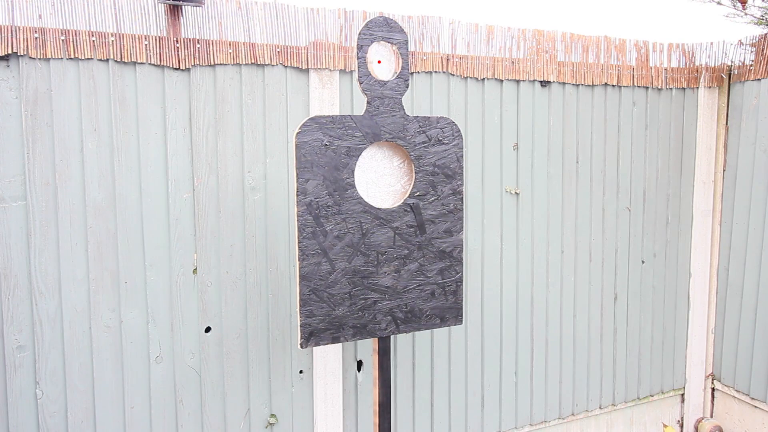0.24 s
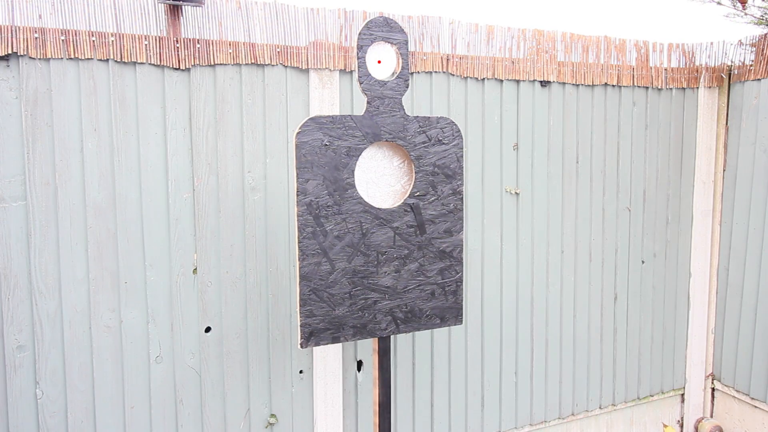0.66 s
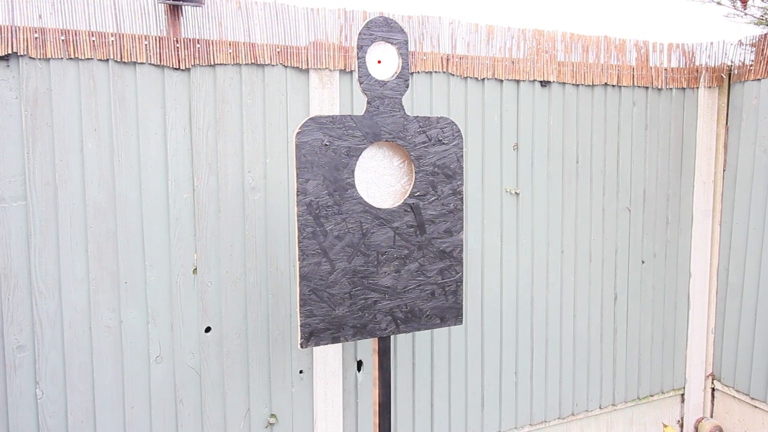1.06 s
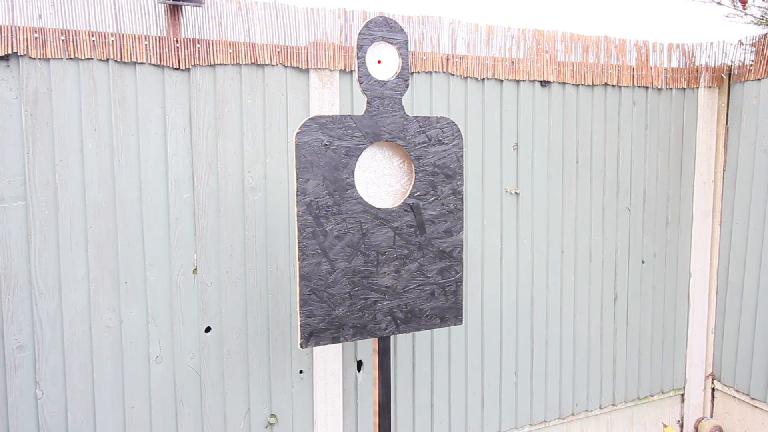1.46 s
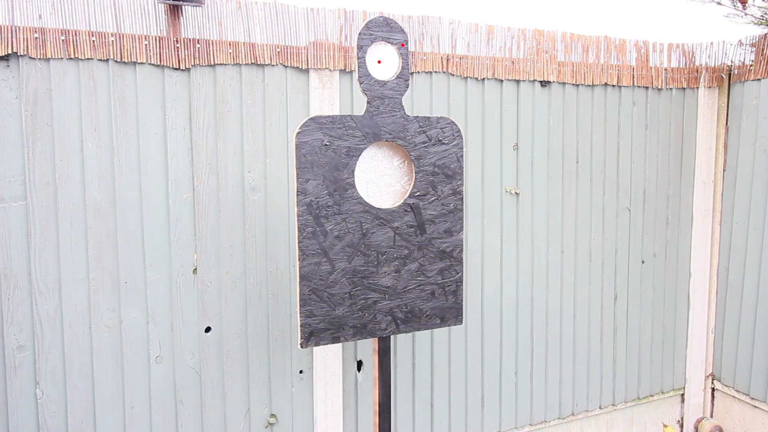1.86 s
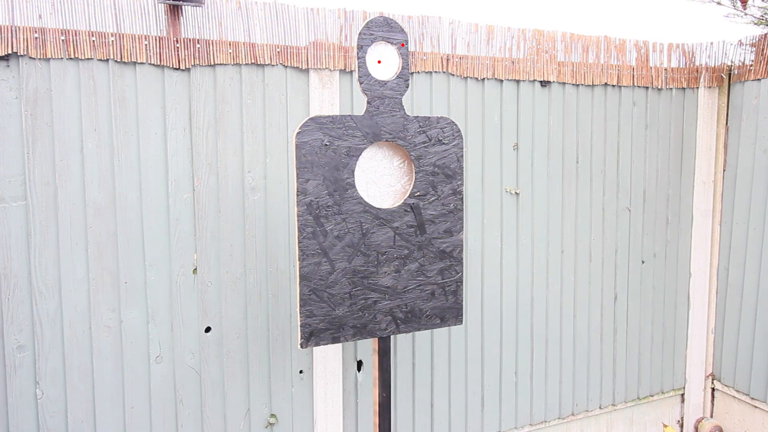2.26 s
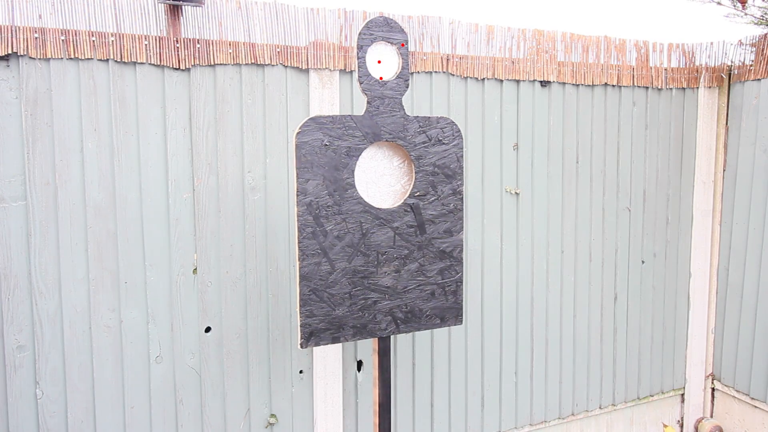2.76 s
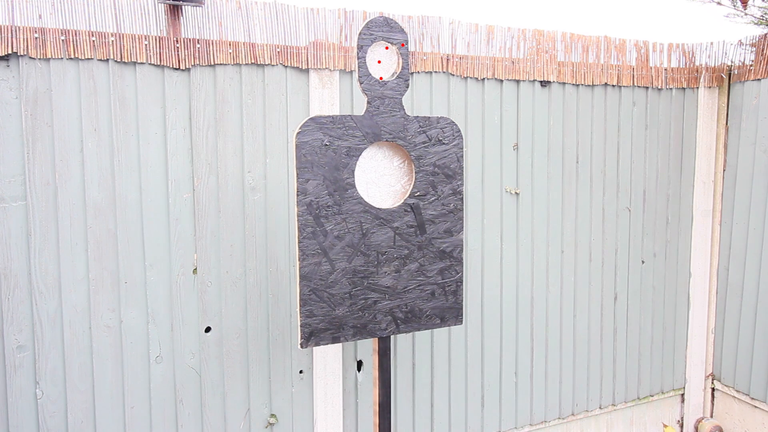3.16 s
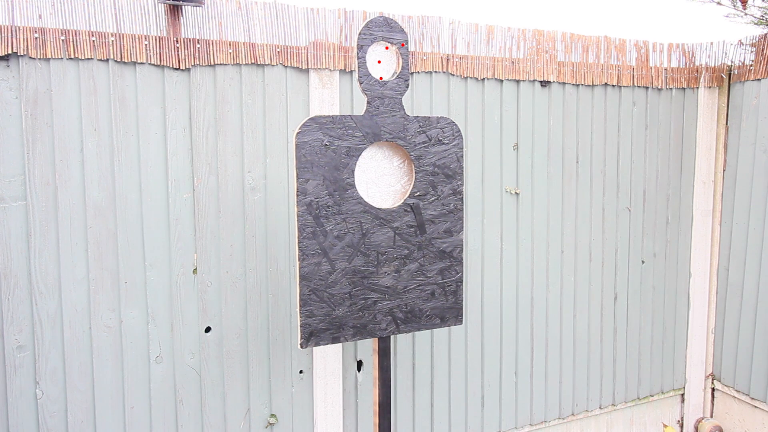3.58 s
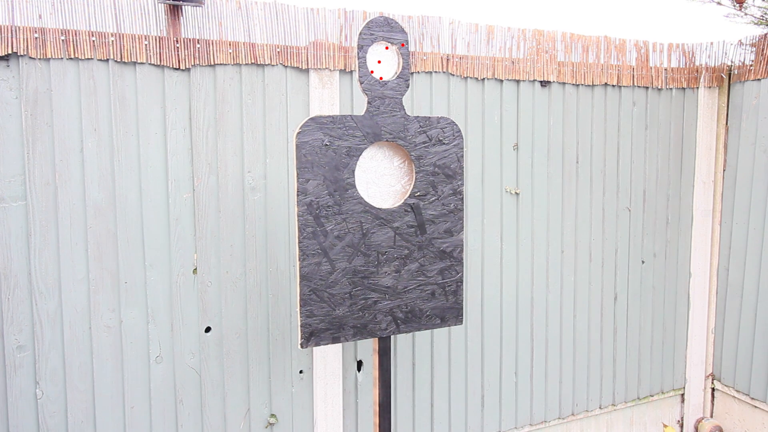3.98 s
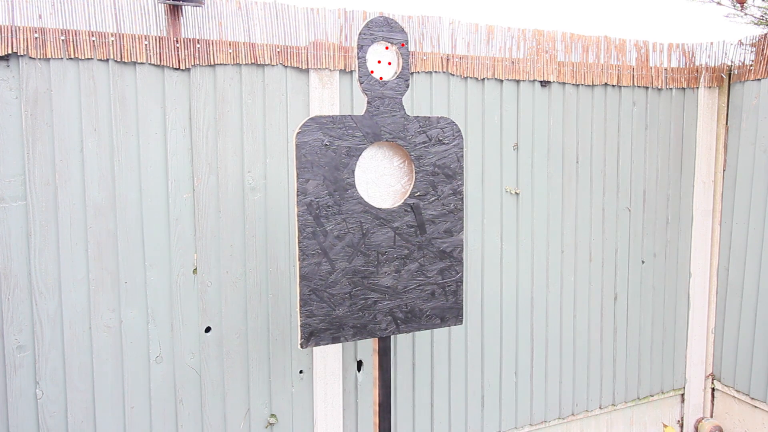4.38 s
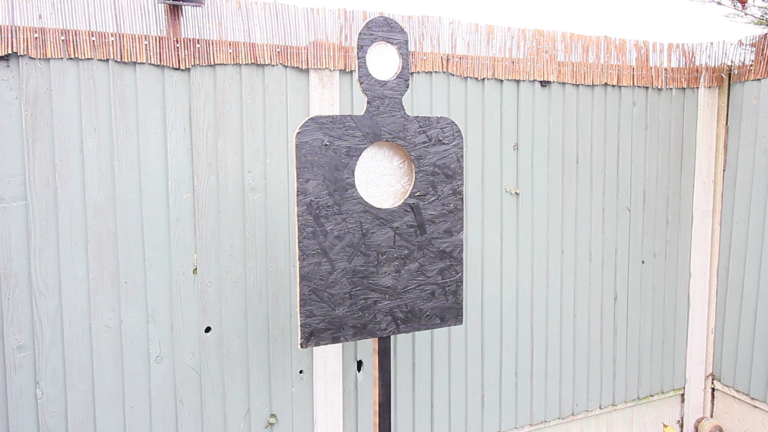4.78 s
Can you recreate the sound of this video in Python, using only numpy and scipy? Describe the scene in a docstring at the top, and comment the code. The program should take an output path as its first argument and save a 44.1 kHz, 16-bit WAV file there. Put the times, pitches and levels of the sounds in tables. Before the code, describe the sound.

Spaced single shots from a gas-powered pellet pistol crack and hiss in a garden, pellets slapping hard into a board close to the microphone.

```python
"""A fenced garden: a gas blowback airsoft pistol fires six times at a target close to the microphone.
Each shot pops, cracks and hisses from ringing modes, pulses and coloured noise, and the slide clatters.
Some 90 ms later the pellet smacks the target, in noise shaped by the board, and overloads the microphone.
Fence, plants and a far wall answer; faint knocks and a ricochet are heard too. Wind nudges the microphone,
and the distant outdoor wash, drifting noise, sinks after each shot, then creeps back."""
import sys
import numpy as np
from scipy import signal
from scipy.fft import rfft, irfft, next_fast_len
from scipy.io import wavfile
from scipy.ndimage import uniform_filter1d

SR = 44100
rng = np.random.default_rng(int(sys.argv[2]) if len(sys.argv) > 2 else 0)


def dump_mix(stems):
    """Bounce the given channels to the path in sys.argv[1] as a 16-bit WAV at rate SR."""
    frames = np.atleast_2d(stems).T  # one column per channel
    limited = np.clip(frames, -1, 1)  # hard clip at full scale
    pcm = np.round(limited * 32767).astype(np.int16)
    wavfile.write(sys.argv[1], SR, pcm)


N = 221689
AGE = np.arange(SR // 2) / SR  # time since a blow, s

# the shots, one row each: valve opens [t/s], relative level [level/dB], slide noise [level/dB],
# how long the wash stays sunk [t/s]
SHOTS = [(-.056, 3, 5, 0.4), (1.7539, 5.5, 2.5, 0.47), (2.349, -2, 3.5, .48), (3.044, 0, 4.5, 0.44),
         (3.7745, 2.5, 0.5, 0.46), (4.3909, -1, 5.5, 0.45)]
# colour of the escaping gas: [f/Hz, relative level/dB per Hz]
GAS_COLOUR = [(40, -19), (150, -9.5), (400, -9.5), (900, 0), (1700, -1.5), (2500, -6.5), (4200, -1),
              (4800, -12.5), (6300, -9.5), (7000, -19), (7800, -15), (10000, -23), (16000, -24)]
# colour of the slide, the faint lead-in and the flying pellet: [f/Hz, relative level/dB per Hz]
SLIDE_COLOUR = [(100, -22), (400, -9.5), (900, -7), (1900, 4), (3000, -2.5), (4500, -7.5), (7000, -11),
                (10000, -17.5), (16000, -25)]
# colour of a struck surface: [f/Hz, relative level/dB per Hz]
SMACK_COLOUR = [(40, -39), (130, -33.5), (270, -13.5), (450, -22.5), (900, -5.5), (1600, -5.5),
                (2400, -5.5), (3200, -1), (4400, 0), (6200, -6), (7500, -6), (9000, -6.5), (12000, -10),
                (16000, -12.5)]


def amp(db):
    """Decibels to gain."""
    return 10 ** (np.asarray(db) / 20)


def evened(x):
    """Scales to an rms of 1."""
    return x / np.sqrt(np.mean(x ** 2) + 1e-20)


def read(points, hz):
    """Reads a table on a log-frequency axis."""
    f, value = np.transpose(points)
    return np.interp(np.log(hz + 1), np.log(f + 1), value)


def add(mix, s, sound):
    """Mixes a sound in at time s; whatever falls before the start is cut."""
    start = round(s * SR)
    sound = sound[max(-start, 0):]
    part = mix[max(start, 0):][:len(sound)]
    part += sound[:len(part)]


def noise(spectrum, size):
    """Noise of rms 1 with the given colour."""
    span = next_fast_len(size, True)
    gain = amp(read(spectrum, np.fft.rfftfreq(span, 1 / SR)))
    coloured = irfft(rfft(rng.standard_normal(span)) * gain, span)
    return evened(coloured[:size])


def band(x, lo_hz, hi_hz):
    """Second-order band-pass."""
    sos = signal.butter(2, [lo_hz, min(hi_hz, SR / 2 - 1)], "band", fs=SR, output="sos")
    return signal.sosfilt(sos, x)


def shelves(x, bass_db, treble_db, bass_hz=1500, treble_hz=6500):
    """Lifts or lowers both ends of the spectrum."""
    hz = np.fft.rfftfreq(len(x), 1 / SR)
    bass = bass_db / (1 + (hz / bass_hz) ** 2)
    treble = treble_db * hz ** 2 / (hz ** 2 + treble_hz ** 2)
    return irfft(rfft(x) * amp(bass + treble), len(x))


def fall(t60, start=0):
    """Envelope that jumps up at start and dies away by 60 dB in t60 seconds."""
    return (AGE >= start) * np.exp(-np.log(1000) * np.maximum(AGE - start, 0) / t60)


def ring(modes, start, rise_s=0.00015):
    """Dying modes, all pushed at the same moment."""
    age = AGE - start
    push = np.clip(age / rise_s, 0, 1)
    return push * sum(amp(db) * fall(t60, start) * np.cos(2 * np.pi * hz * age) for hz, db, t60 in modes)


def fuzzy_ring(hz, width_hz, t60):
    """A rough, dying resonance: noise in one band around hz; the narrower it is, the slower it builds up."""
    bins = np.fft.rfftfreq(len(AGE), 1 / SR) + 1
    detune = (bins / hz - hz / bins) * hz / width_hz
    rough = irfft(rfft(rng.standard_normal(len(AGE))) / (1 + detune ** 2), len(AGE))
    build = 1 - np.exp(-np.pi * width_hz * AGE)
    return evened(rough) * build * fall(t60)


def click(spectrum, size=2048):
    """A causal pulse of peak 1 with the given colour, its phase derived from its log spectrum."""
    log_gain = np.log(amp(read(spectrum, abs(np.fft.fftfreq(size, 1 / SR)))))
    pulse = np.fft.ifft(np.exp(np.conj(signal.hilbert(log_gain)))).real[:size // 2]
    return pulse / abs(pulse).max()


def pistol(spray_db=-31, spray_t60=0.12, spray_start=0.0049,
           lead_in_db=-45, lead_in_t60=.03, lead_in_s=.002, boom_growth=1.2):
    """Nothing moves between shots, so the blast repeats; faint lead-in, gas spray and slide clatter differ."""
    # the slide hits its stop, strips a pellet and runs home: [t/s after the shot, level/dB, t60/s]
    slide_knocks = [(.036, -30.5, 0.047), (.046, -36.5, 0.093), (0.074, -33.5, .08)]
    clatter = sum(amp(db) * fall(t60, s) for s, db, t60 in slide_knocks)
    out = np.zeros(N)
    boom, report = blast()
    for s, db, slide_db, _ in SHOTS:
        spray = amp(spray_db) * noise(GAS_COLOUR, len(AGE)) * fall(spray_t60, spray_start)
        lead_in = amp(db + lead_in_db) * noise(SLIDE_COLOUR, len(AGE)) * fall(lead_in_t60)
        slide = amp(slide_db) * clatter * noise(SLIDE_COLOUR, len(AGE))
        add(out, s - lead_in_s, lead_in)  # faint noise starting just before the shot
        add(out, s, amp(boom_growth * db) * boom)  # the boom grows faster than the rest of the shot
        add(out, s, amp(db) * (report + spray) + slide)
    return out


def blast(pop_hz=760, pop_db=-16.5, pop_rise_s=0.0026, pop_t60=0.016, crack_db=-14,
          gas_db=-24, gas_t60=0.23, swell_s=0.0084, leak_db=-38):
    """The valve opens: gas leaks, a hollow pop swells in the barrel, then cracks out and hisses away."""
    # muzzle crack and its slaps off nearby surfaces: [t/ms after the valve opens, relative level/dB]
    slaps = [(3.55, 0), (5.03, -5), (6.22, -1), (7.5, -6), (9.22, -5), (11.25, -6), (15.85, 1), (17.28, -3),
             (17.85, -7)]
    # colour of the crack: [f/Hz, relative level/dB per Hz]
    crack_colour = [(60, -8.5), (250, -10.5), (1000, -1.5), (1600, 9), (4000, 3), (5500, -5.5),
                    (8000, -31.5), (12000, -34), (16000, -22)]
    # what the blast sets ringing: [f/Hz, level/dB, t60/s]
    blast_modes = [(275, -24, .08), (385, -24.5, .06), (432, -29.5, .1), (645, -30, .08), (738, -26, .07),
                   (915, -27, .06), (1552, -28, .1), (1650, -35, .14), (2070, -34, .12), (2355, -35, .12),
                   (2820, -35, .12), (3025, -32, .09), (3500, -35, .1), (4000, -34, .1), (4340, -35, .11)]
    exit_s = slaps[0][0] / 1000
    swell = np.where(AGE < exit_s, np.exp(-((AGE - exit_s) / pop_rise_s) ** 2 / 2), fall(pop_t60, exit_s))
    pop = amp(pop_db) * swell * np.cos(2 * np.pi * pop_hz * (AGE - exit_s))
    cracks, crack = np.zeros(len(AGE)), click(crack_colour)
    for ms, db in slaps:
        add(cracks, ms / 1000, amp(crack_db + db) * crack)
    opening = 1 - np.exp(-(AGE / swell_s) ** 4)
    flow = amp(leak_db) + amp(gas_db) * opening
    gas = flow * noise(GAS_COLOUR, len(AGE)) * fall(gas_t60)
    return pop + ring(blast_modes, exit_s), cracks + gas


def target(snap_db=-4, snap_t60=0.012, board_db=-21, board_t60=0.1, board_treble_db=-4,
           note_db=-11.0, note_width=0.083, rebound_s=.0056, rebound_db=-6,
           fence_s=0.0068, fence_db=-9, thump_t60=0.024):
    """The pellet snaps through, hits the backstop and rebounds; the board rings, duller, then a low hum."""
    # pellets on the target, one row each: [t/s, relative level/dB, bass/dB, treble/dB,
    # backstop delay t/ms, backstop relative level/dB, the struck spot's low note f/Hz, relative level/dB,
    # its high note f/Hz, relative level/dB, t60/s of both, centre of the long ring f/Hz,
    # its relative level/dB, low thump level/dB]
    hits = [(0.0336, -2, 3, 7.5, 2.31, -6, 2244, -4, 4156, -11, 0.076, 2760, -0.5, -59.5),
            (1.8422, -0.5, 1, -7, 2.42, -1.5, 1680, -4.5, 4750, -1.5, 0.041, 1950, -5, -35.5),
            (2.4378, -1.5, 0.5, -7, 3.07, -4.5, 1570, -4, 5070, -3, 0.055, 2056, -3, -39),
            (3.1337, -5.5, 0.5, 13, 3.3, 3.5, 5850, 0.5, 6410, -3.5, 0.057, 5720, -4.5, -53),
            (3.8642, 0.5, 12.5, 13, 2.9, -12.5, 2765, -9.5, 4810, -20.5, 0.073, 1234, -7.5, -46),
            (4.4812, -4, -21.5, -4.5, 3.16, -0.5, 2278, -4.5, 4380, 1, .05, 3100, -3, -55)]
    # colour of the low thump: [f/Hz, relative level/dB per Hz]
    thump_colour = [(20, -0.5), (110, -2), (250, -11.5), (600, -43), (2000, -89.5)]
    out = np.zeros(N)
    for (s, db, bass_db, treble_db, back_ms, back_db, low_hz, low_db, high_hz, high_db, t60,
         long_hz, long_db, thump_db) in hits:
        back_s = back_ms / 1000
        blows = [(0, 0), (back_s, back_db), (rebound_s, rebound_db), (fence_s, fence_db)]
        for delay, blow_db in blows:
            snap = smack(bass_db, treble_db) * fall(snap_t60)
            add(out, s + delay, amp(snap_db + db + blow_db) * snap)
        board = smack(bass_db, treble_db + board_treble_db) * fall(board_t60, back_s)
        add(out, s, amp(board_db + db) * board)
        for hz, ring_db in [(low_hz, low_db), (high_hz, high_db)]:
            add(out, s, amp(note_db + db + ring_db) * fuzzy_ring(hz, note_width * hz, t60))
        add(out, s + back_s, amp(long_db) * singing(long_hz))
        add(out, s, hum())
        add(out, s, amp(thump_db) * noise(thump_colour, len(AGE)) * fall(thump_t60))
        add(out, s - AGE[-1], whizz())  # ends at the hit
    return out


def smack(bass_db, treble_db):
    """Noise of rms 1 in the colour of the struck board, with its resonances standing out."""
    # resonances of the target board: [f/Hz, width f/Hz, level/dB over the smooth colour]
    board_peaks = [(1550, 300, 5.5), (2430, 150, 3.5), (3040, 120, 3.5), (3810, 63, 5), (4450, 180, 7.5),
                   (4690, 140, -4), (5450, 200, -2.5), (5940, 160, 12.5), (6690, 160, 9), (8900, 350, 6.5)]
    bins = np.fft.rfftfreq(len(AGE), 1 / SR)
    peaks_db = sum(db / (1 + (2 * (bins - hz) / width) ** 2) for hz, width, db in board_peaks)
    board = irfft(rfft(noise(SMACK_COLOUR, len(AGE))) * amp(peaks_db), len(AGE))
    return evened(shelves(board, bass_db, treble_db))


def singing(centre_hz, sing_db=-39, reach=0.27):
    """The target's long, wavering modes; the nearer to centre_hz, the more strongly each is set going."""
    # what the target sings on with: [f/Hz, relative level/dB, t60/s, width f/Hz]
    target_modes = [(1250, -2, 0.72, 30), (1470, -6, 0.35, 30), (1725, -4, 0.52, 50), (2030, -2, 0.55, 62),
                    (2270, -1, 0.3, 36), (2920, -15, .3, 90), (3760, -3, 0.7, 120), (4400, -1.5, .4, 170),
                    (5950, -4, 0.39, 260), (6400, -3.5, .38, 350)]
    out = np.zeros(len(AGE))
    for hz, db, t60, width_hz in target_modes:
        near = np.exp(-(np.log(hz / centre_hz) / reach) ** 2)
        out += near * amp(sing_db + db) * fuzzy_ring(hz, width_hz, t60)
    return out


def hum(hum_db=-39, hum_hz=460, hum_width_hz=220, swell_s=0.044, hum_t60=0.23):
    """A low hum that swells just after a hit and dies away."""
    swell = 1 - np.exp(-(AGE / swell_s) ** 2)
    return amp(hum_db) * swell * fuzzy_ring(hum_hz, hum_width_hz, hum_t60)


def whizz(whizz_db=-30, whizz_t60=0.17, flight_s=.085):
    """The rush of the pellet, swelling as it nears the target: a fall turned back to front."""
    approach = (fall(whizz_t60) * (AGE < flight_s))[::-1]
    return amp(whizz_db) * noise(SLIDE_COLOUR, len(AGE)) * approach


def small_knocks(rattle_db=7, rattle_t60=0.3, rattle_treble_db=5, metal_db=-3, metal_width_hz=270):
    """Faint knocks as bands of dying noise, and a ricochet that rattles the modes of thin metal."""
    # handling and spent pellets: [t/s, level/dB, t60/s, centre f/Hz, width f/Hz]
    knocks = [(.308, -67, 0.058, 5800, 3480), (.38, -49, 0.4, 590, 740), (.38, -57.5, 0.15, 4220, 1300),
              (.384, -68, 0.2, 9160, 2200), (.408, -52, .18, 2935, 200), (.776, -52.5, 0.2, 3715, 4800),
              (3.439, -53, 0.17, 710, 1216), (3.441, -68.5, .22, 4600, 5060), (3.668, -63, .06, 4910, 5150),
              (3.67, -39, .08, 250, 166.4), (3.719, -33.5, .07, 310, 190)]
    # a ricochet strikes thin metal: [t/s, relative level/dB]
    ricochets = [(4.018, -52)]
    # modes of the metal: [f/Hz, relative level/dB, t60/s]
    metal_modes = [(1015, 3, 0.99), (1207, -9, 0.77), (1460, 1.5, 1), (1760, 0.5, .45), (2100, 4.5, 0.49),
                   (2730, 8.5, .32), (3400, 4.5, 0.61), (4300, 4.5, .3), (6060, -4, 0.16), (8040, -7, 0.24),
                   (11900, 2, 0.17)]
    out = np.zeros(N)
    for s, db, t60, hz, width in knocks:
        add(out, s, amp(db) * fuzzy_ring(hz, width, t60))
    for s, db in ricochets:
        metal = sum(amp(metal_db + mode_db) * fuzzy_ring(hz, metal_width_hz, t60)
                    for hz, mode_db, t60 in metal_modes)
        rattle = shelves(noise(SMACK_COLOUR, len(AGE)), 0, rattle_treble_db) * fall(rattle_t60)
        add(out, s, amp(db) * (metal + amp(rattle_db) * rattle))
    return out


def garden(x, count=3, turns_per_s=170):
    """Sound is dealt in turn to separate sets of scattering paths, so the tails stay grainy."""
    turns = turns_per_s * np.arange(N) / SR
    out = np.zeros(N)
    for k in range(count):
        share = np.sqrt(2 / count) * np.cos(np.pi * (turns + k / count))  # squares sum to 1
        out += signal.fftconvolve(x * share, reflections())[:N]
    return out


def reflections(tail_db=-23, tail_rise_s=0.004, wall_s=.119, wall_db=-41, wall_t60=0.045,
                wall_low_hz=2000, wall_high_hz=6500):
    """A thin tail scattered by fences and plants, and one smeared echo from a far wall."""
    # colour of the tail at its start: [f/Hz, relative level/dB]
    tail_colour = [(100, -1), (500, 4), (1100, -0.5), (1800, -1), (2600, -4), (4500, -10), (7000, -7),
                   (11000, -6), (16000, -4)]
    # how fast the garden dies away: [f/Hz, t60/s]
    garden_t60 = [(150, 0.2), (500, 0.3), (1800, 0.6), (4000, .6), (7000, .48), (11000, 0.34),
                  (16000, 0.25)]
    hz, t, z = signal.stft(noise(tail_colour, SR), SR, nperseg=256)
    decay = np.exp(-np.log(1000) * t / read(garden_t60, hz)[:, None])
    tail = signal.istft(z * decay, SR, nperseg=256)[1]
    tail = tail * np.minimum(np.arange(len(tail)) / (tail_rise_s * SR), 1)
    tail = amp(tail_db) * tail / np.linalg.norm(tail)
    wall = band(rng.standard_normal(len(AGE)), wall_low_hz, wall_high_hz) * fall(wall_t60)
    add(tail, wall_s, amp(wall_db) * wall / np.linalg.norm(wall))
    return tail


def wind(gust_db=-4, swell_s=0.021, fade_s=0.015, flutter_db=-20, flutter_hz=280, flutter_top_hz=650):
    """Low buffets on the microphone: each swells and fades, with a weaker flutter higher up."""
    # buffets: [t/s at the height, relative level/dB]
    gusts = [(1.319, -37.5), (1.409, -38), (2.001, -46), (2.091, -38.5), (2.161, -45.5), (2.278, -36),
             (2.33, -36), (2.387, -40.5), (2.8, -52.5), (2.891, -45.5), (3.002, -48.5), (3.454, -46.5),
             (3.527, -49.5), (3.601, -38), (3.672, -35.5), (3.726, -32), (3.786, -31.5), (3.961, -54),
             (4.274, -47)]
    # colour of the wind: [f/Hz, relative level/dB per Hz]
    wind_colour = [(12, -41), (20, -5), (43, 11), (151, 11), (295, -4), (393, -16), (476, -29), (614, -23),
                   (900, -32), (1170, -55.5), (1980, -120)]
    t, push = np.arange(N) / SR, np.zeros(N)
    for s, db in gusts:
        push += amp(gust_db + db) * np.exp(-((t - s) / np.where(t < s, swell_s, fade_s)) ** 2 / 2)
    flutter = evened(band(rng.standard_normal(N), flutter_hz, flutter_top_hz))
    return push * (noise(wind_colour, N) + amp(flutter_db) * flutter)


def wash(wash_db=-44.5, hiss_db=1, hiss_hz=3500, patchy_db=1.7):
    """Distant roar and fine hiss in drifting patches, sinking after each shot and creeping back."""
    # colour of the wash: [f/Hz, relative level/dB per Hz]
    wash_colour = [(15, -28), (25, -6.5), (130, -4), (161, -4), (206, -6), (249, 3), (439, -6.5), (503, -4),
                   (659, -6.5), (988, -5.5), (1100, -7.5), (2610, -22), (7110, -38), (14800, -39.5),
                   (16000, -40.5)]
    # slow swell of the distant roar: [t/s, relative level/dB]
    wash_swell = [(0, 4.5), (.85, 0), (1.1, -0.5), (1.4, -0.5), (1.6, -1.5), (2.5, -2.5), (5, 0.5)]
    # share of the sinking that each part of the wash follows: [f/Hz, share/1]
    sink_share = [(60, 1.1), (400, 0.98), (1500, .95), (5000, 0.7), (9000, 0.76), (15000, 1.25)]
    hz, t, z = signal.stft(noise(wash_colour, N), SR, nperseg=512, noverlap=384)
    depth = np.interp(t, np.arange(N) / SR, sunk_db())
    swell = np.interp(t, *np.transpose(wash_swell))
    lift = hiss_db * hz ** 2 / (hz ** 2 + hiss_hz ** 2)
    patches = uniform_filter1d(rng.standard_normal(z.shape), size=3, axis=0)  # over frequency
    patches = evened(uniform_filter1d(patches, size=24, axis=1))  # over time
    sinking = read(sink_share, hz)[:, None] * depth
    z = z * amp(wash_db + swell + lift[:, None] + patchy_db * patches - sinking)
    return signal.istft(z, SR, nperseg=512, noverlap=384)[1][:N]


def sunk_db(sink_db=21.5, sink_s=.02, climb_db_per_s=43):
    """How far the wash has sunk: a quick drop at each shot, a hold, a steady climb."""
    # once, after the last shot, the wash jumps back up: [t/s, level/dB]
    wash_jumps = [(4.729, 17)]
    t, depth = np.arange(N) / SR, np.zeros(N)
    for s, _, _, hold_s in SHOTS:
        drop = sink_db * np.clip((t - s) / sink_s, 0, 1)
        depth = np.maximum(depth, drop - climb_db_per_s * np.maximum(t - s - hold_s, 0))
    for s, db in wash_jumps:
        depth = np.maximum(depth - db * (t > s), 0)
    return uniform_filter1d(depth, size=200)  # rounds the corners


def scene():
    """Pistol, target and knocks in the garden, over wash and wind."""
    direct = pistol() + target() + small_knocks()
    return (direct + garden(direct) + wash() + wind())[None]


def record(dry, ceiling=.56, edge_hz=16100):
    """The loudest peaks overload the microphone, bending towards a ceiling; then the band limit."""
    clipped = dry / (1 + (dry / ceiling) ** 6) ** (1 / 6)
    low_pass = signal.firwin(255, edge_hz, window=("kaiser", 9), fs=SR)
    return signal.oaconvolve(clipped, low_pass[None], "same")


dry = scene()
out = record(dry)
dump_mix(out)
```